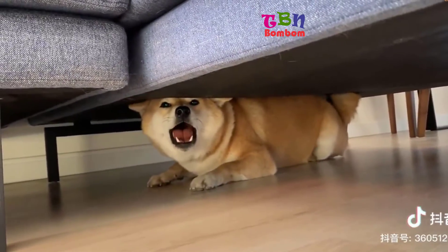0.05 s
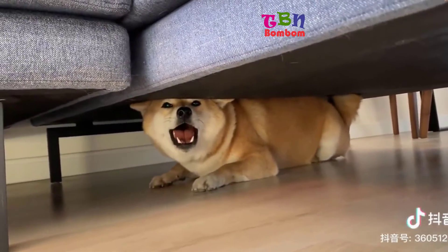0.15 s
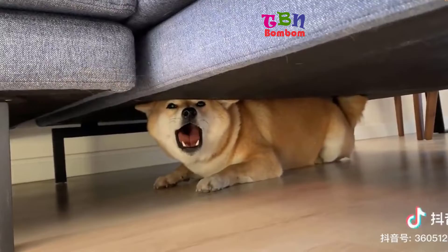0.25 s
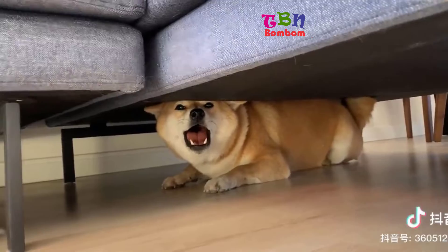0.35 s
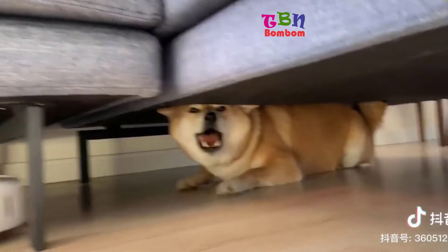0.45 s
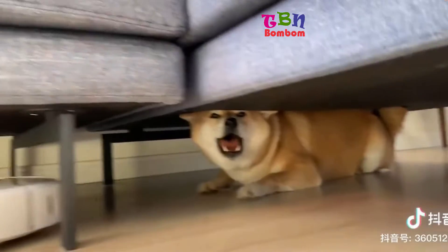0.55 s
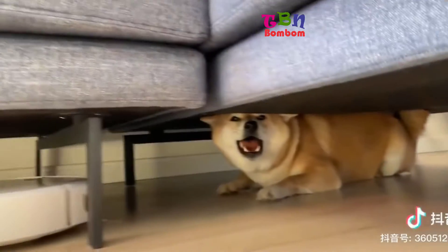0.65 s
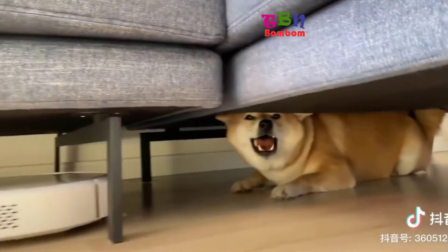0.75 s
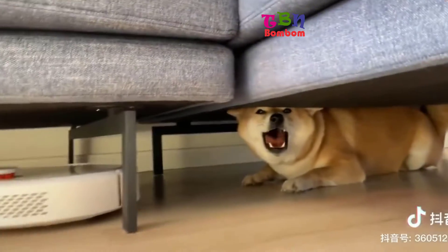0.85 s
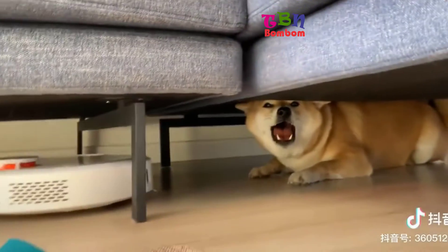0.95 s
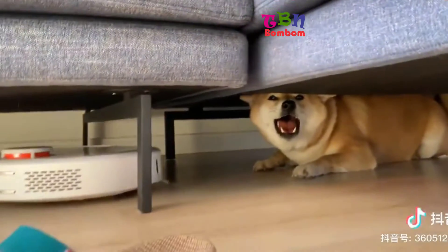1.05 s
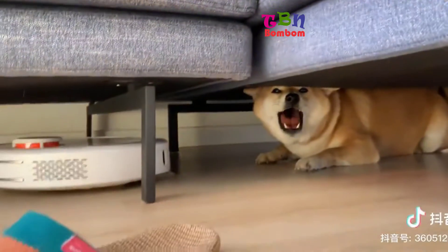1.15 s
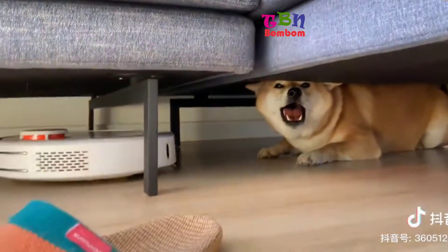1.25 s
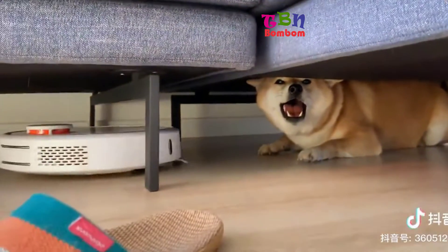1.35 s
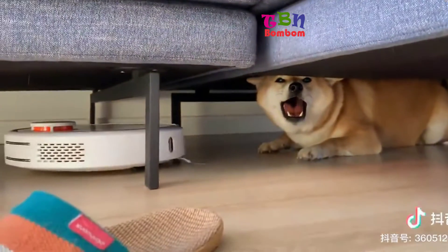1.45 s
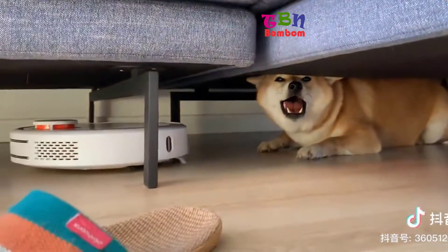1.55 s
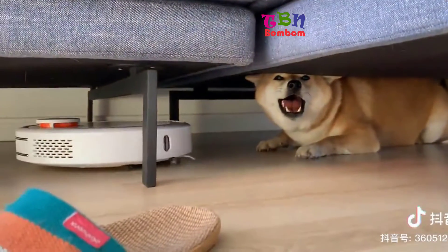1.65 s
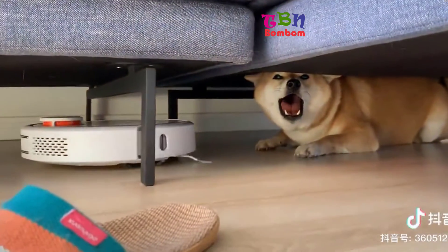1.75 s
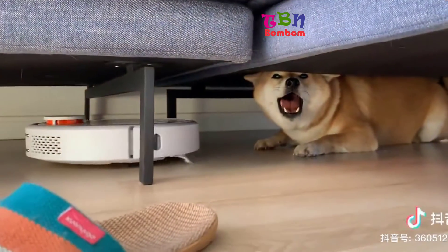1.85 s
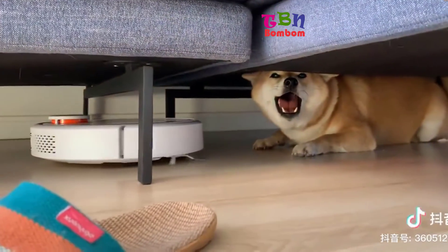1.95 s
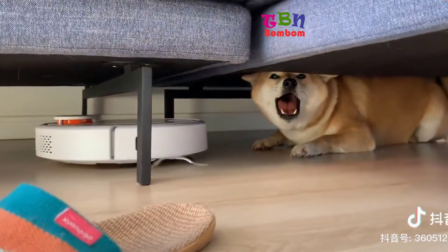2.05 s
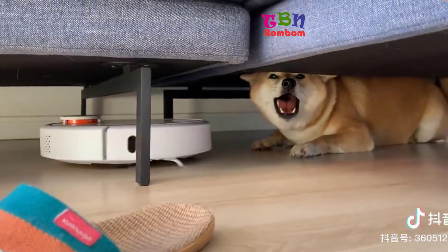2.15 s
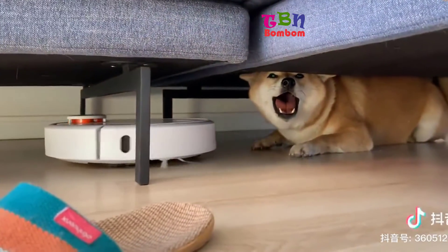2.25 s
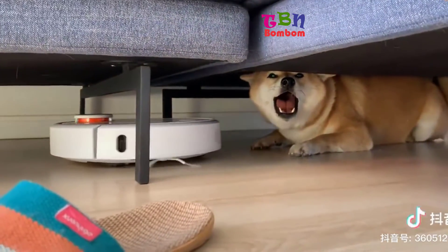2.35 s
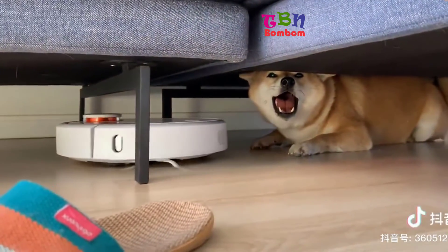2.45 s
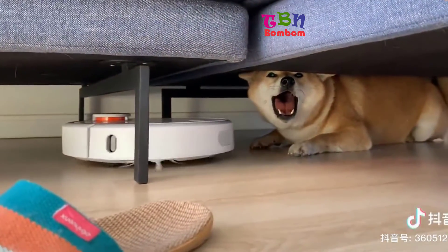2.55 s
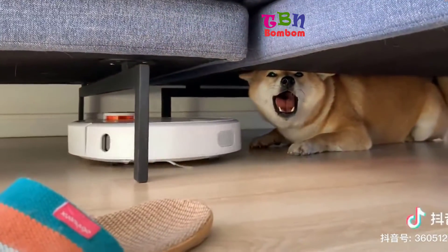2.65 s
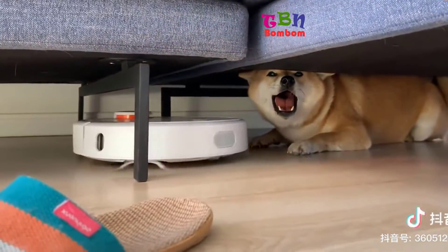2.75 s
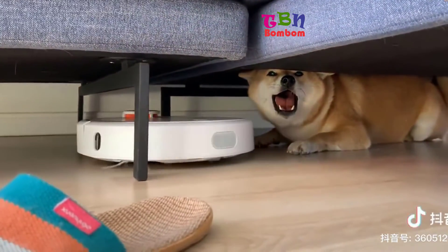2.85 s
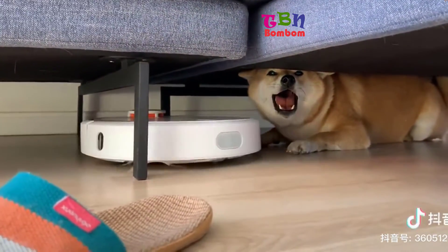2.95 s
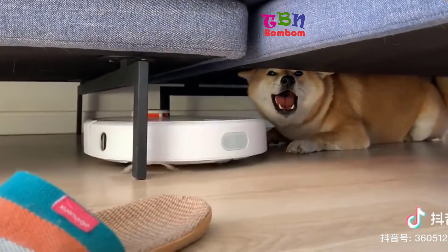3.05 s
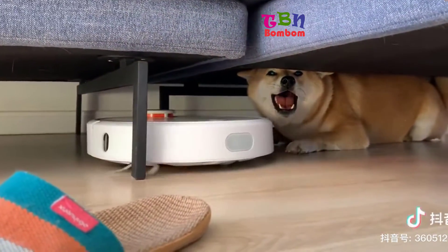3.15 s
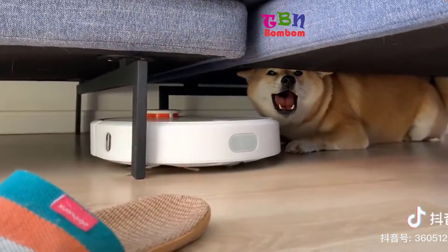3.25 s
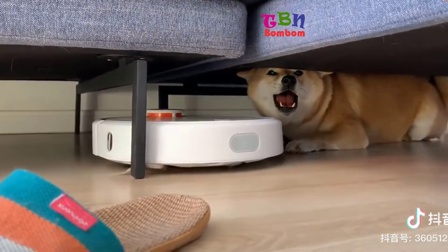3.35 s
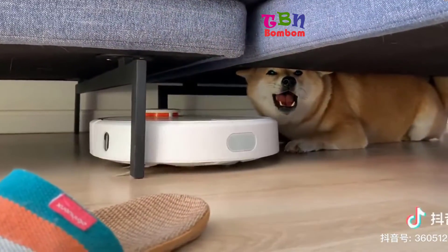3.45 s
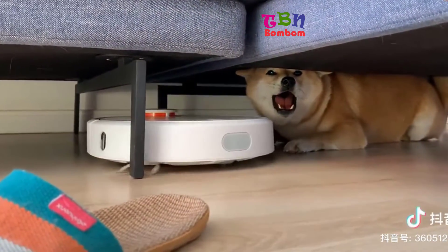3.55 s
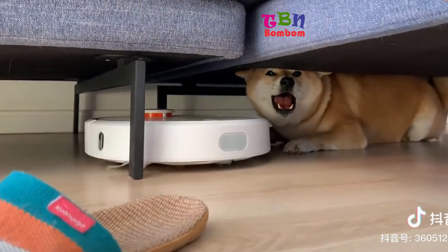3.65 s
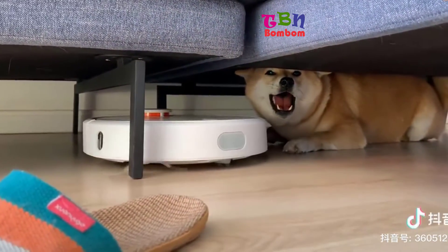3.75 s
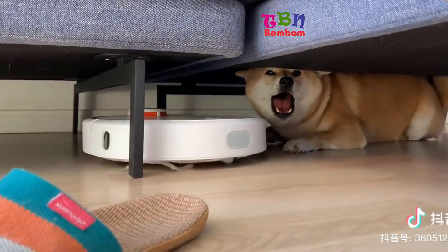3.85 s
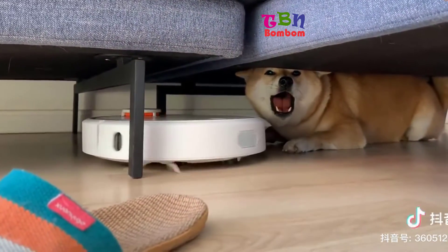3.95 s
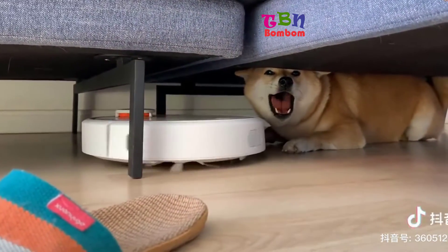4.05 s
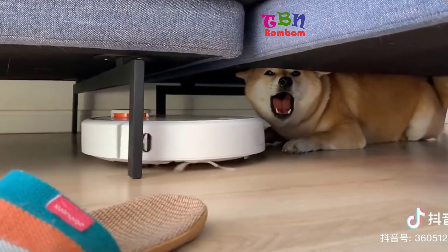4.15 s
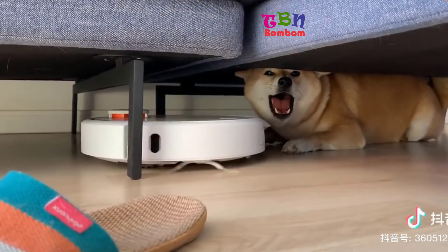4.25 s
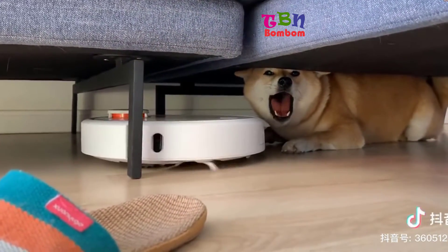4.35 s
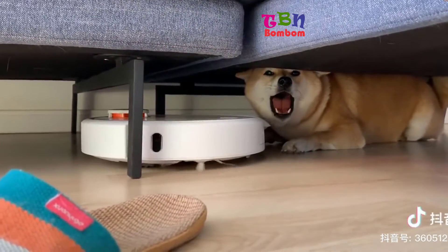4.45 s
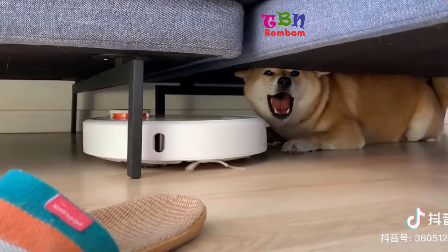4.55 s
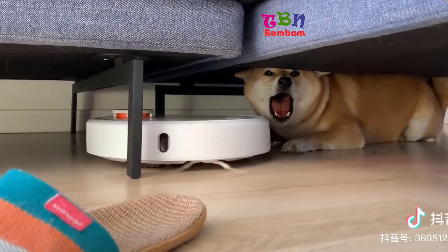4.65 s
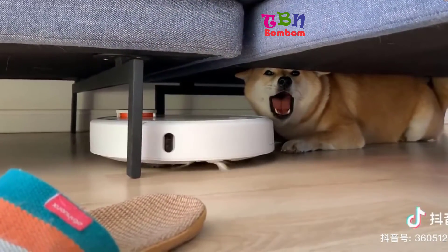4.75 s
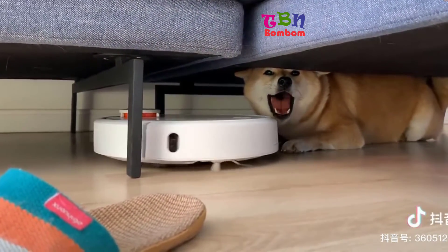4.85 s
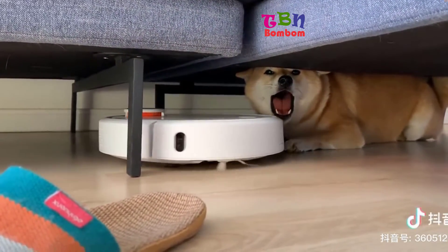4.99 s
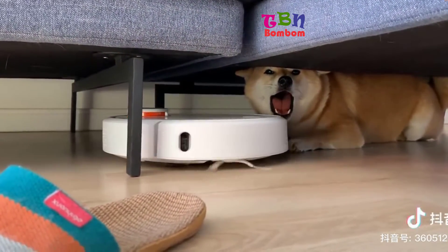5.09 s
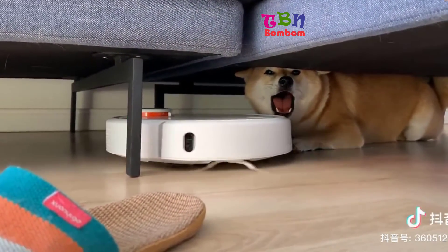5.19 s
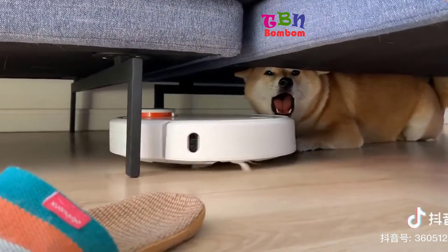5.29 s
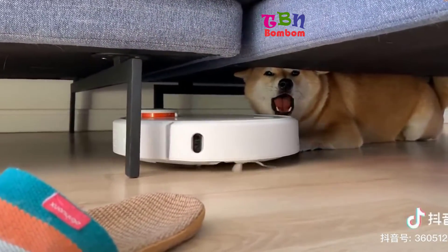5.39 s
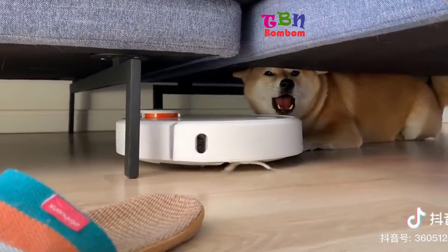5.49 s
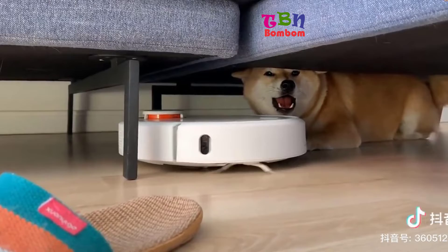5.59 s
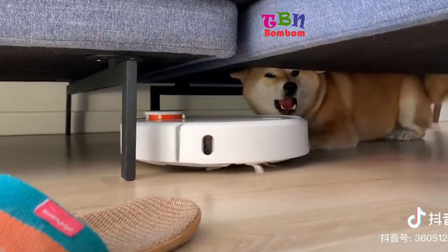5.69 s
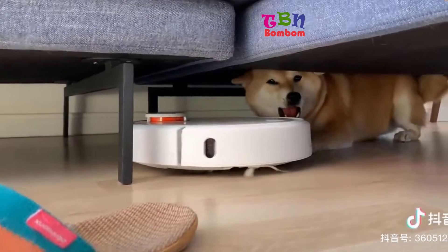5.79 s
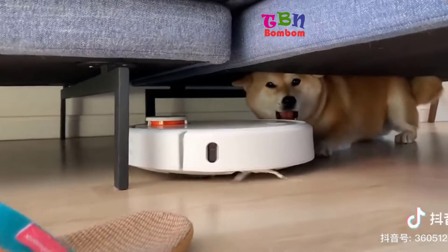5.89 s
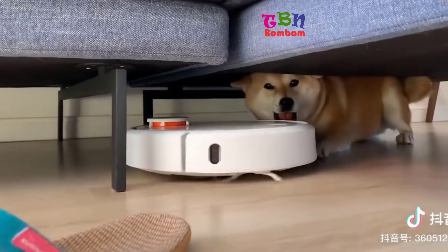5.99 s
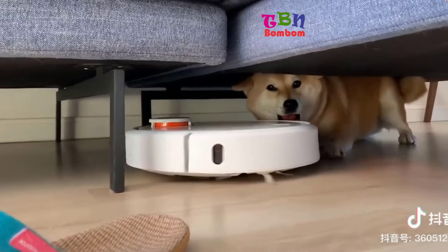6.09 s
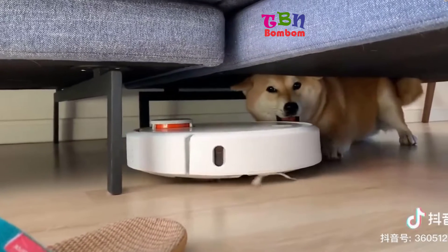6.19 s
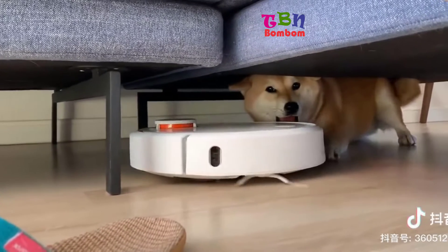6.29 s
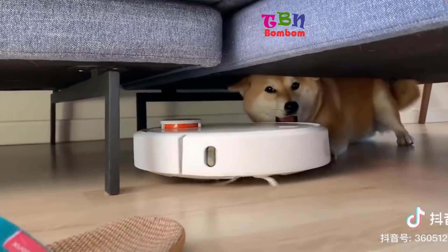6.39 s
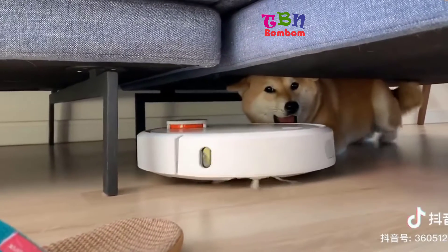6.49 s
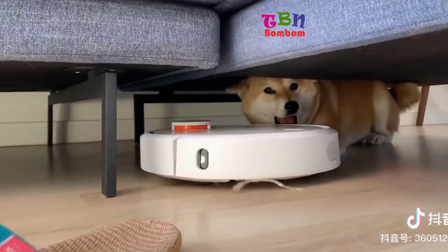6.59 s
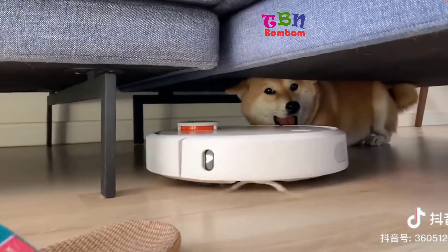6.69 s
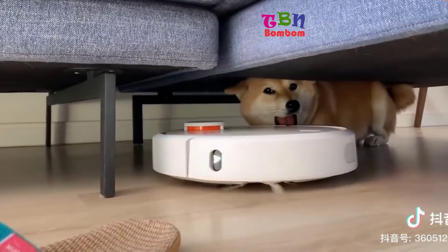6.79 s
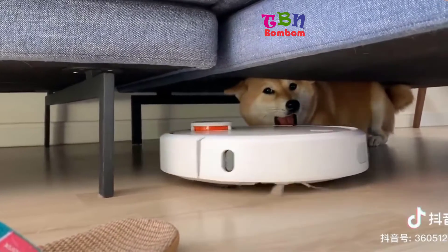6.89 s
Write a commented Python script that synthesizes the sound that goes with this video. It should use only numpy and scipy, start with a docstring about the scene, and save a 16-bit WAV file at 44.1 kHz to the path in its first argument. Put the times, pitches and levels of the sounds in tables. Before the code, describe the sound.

Under a sofa, a dog lets out a quick series of high yelps, many leaping to a shrill note and breaking into a rasp. Two stretch into longer whines, then a soft sinking whine and three weak yelps follow. Behind it a robot vacuum hums and hisses faintly, fading away. The living room rings briefly, and the loudest yelps slightly overload the close stereo microphone.

```python
"""A small dog yelps from under a sofa at a robot vacuum: the loud yelp rises, flips into a shrill, nearly pure
register, then breaks into a rasp as it falls and the vocal folds flutter. Some yelps stay in the open voice,
three calls stretch into whines, and the last ones are weak. Behind them the vacuum's motor hums and its fan
hisses, and this background grows steadily quieter. The gap under the sofa and the living room ring briefly, and
the loudest yelps overload the close stereo microphone."""
import sys
import numpy as np
from scipy import signal
from scipy.fft import rfft, irfft, next_fast_len
from scipy.io import wavfile
from scipy.ndimage import map_coordinates

SR = 44100
rng = np.random.default_rng(int(sys.argv[2]) if len(sys.argv) > 2 else 0)


def store_wav(level_fs):
    """Save 16-bit WAV to argv[1]."""
    pcm = np.round(np.clip(np.atleast_2d(level_fs), -1, 1) * 32767)
    wavfile.write(sys.argv[1], SR, pcm.T.astype(np.int16))


N = 305480

# yelps that flip into the shrill register: start/s, flip after/s, break after/s, length/s,
# first f/Hz, shrill f/Hz, last f/Hz, open level/dB, shrill level/dB, roughness/0-1
SHRILL_YELPS = [ (0.099, .052, .074, 0.13, 726.7, 1045, 508, -8, -4, 0.83),
                (1.029, 0.04, 0.075, 0.13, 817, 1082, 517, -7.5, -3.5, .85),
                (1.314, .036, .064, .112, 846, 1078, 491, -6, -5, 0.37),
                (1.896, 0.041, 0.067, .120, 862, 1087, 540, -7, -5.5, 0.37),
                (2.163, 0.034, 0.064, 0.11, 889, 1085, 495, -6.5, -5, .55),
                (2.445, 0.04, 0.069, 0.12, 876, 1076, 512, -7, -6, 0.4),
                (3.978, .027, .071, 0.1, 911, 1075, 560, -5.5, -3, 0.9),
                (4.252, 0.029, 0.07, 0.11, 861, 1074, 605, -6.5, -3.5, 0.8),
                (4.517, 0.028, .077, 0.13, 932, 1107, 680, -8, -4, 0.7),
                (4.797, 0.019, 0.067, 0.12, 969, 1123, 651, -7.5, -5.5, 0.28), ]
# yelps in the open voice: start/s, crest after/s, break after/s, length/s,
# first f/Hz, crest f/Hz, last f/Hz, fundamental level/dB, overtone level/dB, roughness/0-1
OPEN_YELPS = [ (0.407, .046, .088, 0.13, 782, 949.5, 503.4, -13.5, -8, 0.8),
              (0.708, 0.053, .078, 0.12, 685.4, 747, 547, -19, -15.5, 0.1),
              (1.613, 0.038, 0.1, 0.12, 850, 926, 615, -14.5, -8.5, 0.07),
              (3.437, 0.05, 0.044, .110, 903, 873, 674, -14.5, -13, 0.02),
              (3.705, 0.052, 0.1, 0.11, 862.5, 896.7, 649, -12, -10.5, .1),
              (6.192, 0.057, .073, .113, 625, 717, 513, -40, -30, 0.75),
              (6.43, 0.051, .046, 0.11, 665, 854, 529, -35.5, -27, 0.9),
              (6.687, 0.048, 0.062, 0.12, 687, 742, 526, -45, -37, 0.37), ]
# contours of the three whines: t/s, f/Hz, fundamental level/dB, overtone level/dB
LEVEL_WHINE = [(2.726, 914, -21, -24), (2.74, 928, -14, -10), (2.772, 924, -17, -10),
               (2.812, 749, -19, -17.5), (2.846, 798, -19, -26), (2.86, 954, -17.5, -27.5),
               (2.892, 863, -19.5, -19), (2.934, 869, -19, -14.5), (2.968, 838, -23, -21.5),
               (2.976, 891, -19.5, -17.5), (3.056, 829.4, -23, -16.5), (3.092, 862, -18, -15),
               (3.206, 817.8, -23.5, -20), (3.215, 768, -19, -26)]
CRACKING_WHINE = [(5.075, 997, -26.5, -26), (5.083, 1006, -15, -18), (5.099, 1099, -8.5, -22.5),
                  (5.133, 1079, -6.5, -21.5), (5.155, 787, -28.5, -20), (5.171, 750, -24.5, -21.5),
                  (5.215, 860, -29.5, -30.5), (5.269, 846, -23, -21), (5.285, 935, -15.5, -25),
                  (5.311, 891, -20.5, -21.5), (5.321, 811.6, -29.5, -24.5), (5.433, 812, -26.5, -22.5),
                  (5.447, 920, -13, -25), (5.487, 941, -12, -22), (5.533, 913, -14, -23.5),
                  (5.575, 859, -23, -32.5)]
SINKING_WHINE = [(5.803, 814, -41, -49), (5.829, 771, -30.5, -28.5), (5.873, 757, -29.5, -24),
                 (5.901, 686, -30.5, -28.5), (5.939, 697, -37.5, -30.5), (5.995, 594, -42, -31.5),
                 (6.03, 613, -34.5, -35.5)]
# where each whine breaks: contour, t/s, roughness/0-1
WHINES = [(LEVEL_WHINE, 2.79, .04), (CRACKING_WHINE, 5.144, .25), (SINKING_WHINE, 5.87, .02)]
# formants of the throat and open mouth: f/Hz, level/dB
THROAT_EQ = [(1050, 20), (1600, -1.5), (1900, 8), (2700, -1), (3150, -9.5), (3900, -11.5), (5000, -47.5),
             (9000, -26), (15000, -59.5)]
# air rushing past the vocal folds, and the snap of their closing: f/Hz, level/dB
BREATH_EQ = [(3000, -19.5), (5600, -13.5), (8000, 7), (10000, 6), (13500, 0.5), (15500, -2.5)]
# chaotic flutter of the folds, heard through the throat: f/Hz, level/dB
RASP_EQ = [(350, -34.5), (700, -14), (1050, 10.5), (1350, -2), (2400, -2.5), (3700, -3), (5200, -37)]
# a nearby surface throws an inverted copy at the microphone's right port: f/Hz, strength/0-1
BOUNCE_STRENGTH = [(1300, 0.12), (1650, 0.78), (2500, 0.47), (3100, 0.26)]
# shading of the right port: f/Hz, level/dB
SHADE_EQ = [(1700, 1.5), (2100, -4.5), (2700, 4.5), (4900, 4.5), (5600, -14.5), (7000, 3)]
# modes of the gap between floor and sofa: f/Hz, width/Hz, strength
SOFA_MODES = [(1047, 31, 1.62), (1915, 63, 1.21), (2142, 23, 1.03), (3200, 130, 1.2)]
# colour of the ring under the sofa: f/Hz, level/dB
SOFA_EQ = [(800, -3.5), (1300, 0), (1900, -2.5), (2500, -0.5), (3200, 1.5), (4000, -0.5)]
# the background level over time: t/s, motor level/dB, suction level/dB
VACUUM_LEVELS = [(0, -36.5, -44.5), (2.4, -45, -60), (4.2, -45.5, -61), (6.93, -62.5, -76.5)]
# rumble of motor and brushes: f/Hz, level/dB
MOTOR_EQ = [(40, -3), (120, -10), (230, -3.5), (400, -6), (1000, -9.5), (1350, -13.5), (1950, -8),
            (2600, -12), (5000, -35)]
# hiss of the suction fan: f/Hz, level/dB
SUCTION_EQ = [(4500, 3), (6500, 2.5), (8300, -3), (14000, -19)]

TOP_HZ = 15500  # band limit of voice and microphone


def dog(reverb_db=-14.5):
    """Each yelp and whine reaches the microphone directly and stirs the room anew."""
    breath, rasp = noise(BREATH_EQ), noise(RASP_EQ)
    calls = [shrill_yelp(*row) for row in SHRILL_YELPS]
    calls += [open_yelp(*row) for row in OPEN_YELPS]
    calls += [whine(*row) for row in WHINES]
    voice, reverb = np.zeros(N), np.zeros((2, N + 2 * SR))
    predelay = SR // 200
    for contour, break_s, depth in calls:
        i = np.arange(int(contour[0][0] * SR), int(contour[-1][0] * SR))
        call = vocal_folds(i / SR, contour, break_s, depth, breath[i], rasp[i])
        voice[i] += call
        tail = room(call)
        onset = i[0] + predelay
        reverb[:, onset:onset + tail.shape[1]] += tail
    return direct_sound(voice) + amp(reverb_db) * filtered(reverb[:, :N], sofa_gap)


def shrill_yelp(start, flip, crack, length, first_hz, top_hz, last_hz, open_db, shrill_db, depth,
                flip_s=.0063, flip_ratio=1.11, break_s=.012, break_ratio=.75, break_db=13.5,
                arch=.03, edge_db=2, purity_db_per_s=323.5):
    """The voice swells, flips up to an arched, nearly pure note, breaks and falls."""
    thin_db = shrill_db - purity_db_per_s * (crack - flip)  # longer notes have weaker overtones
    up, down = start + flip + flip_s / 2, start + crack - break_s / 2
    fundamental_db = open_db - 5.5  # in the open voice it lies under the overtones
    contour = swell(start, flip - flip_s / 2, first_hz, top_hz / flip_ratio, fundamental_db, open_db)
    contour += [(up, top_hz * (1 - arch / 2), shrill_db, thin_db + edge_db),
                ((up + down) / 2, top_hz, shrill_db, thin_db),
                (down, top_hz * (1 - arch), shrill_db - edge_db, thin_db + edge_db),
                (down + break_s, top_hz * break_ratio, shrill_db - break_db, thin_db + edge_db / 2),
                (start + length, last_hz, shrill_db - break_db - 4.5, thin_db - 12.5)]  # the rasp fades
    return contour, start + crack, depth


def open_yelp(start, crest, crack, length, first_hz, crest_hz, last_hz, fundamental_db, overtones_db,
              depth, knee_share=.6):
    """The voice swells to a crest and slides down; past a knee the overtones die away first."""
    knee_s = start + crest + knee_share * (length - crest)
    knee_hz = crest_hz + knee_share * (last_hz - crest_hz)
    contour = swell(start, crest, first_hz, crest_hz, fundamental_db, overtones_db)
    contour += [(knee_s, knee_hz, fundamental_db - 4, overtones_db - 6),
                (start + length, last_hz, fundamental_db - 7, overtones_db - 29)]
    return contour, start + crack, depth


def whine(held, break_s, depth, lift_db=1, sag_s=.019, sag_ratio=.83, sag_db=16.5):
    """A drawn-out note that closes by sagging in pitch and level."""
    contour = [(s, hz, low_db, high_db + lift_db) for s, hz, low_db, high_db in held]
    s, hz, low_db, high_db = contour[-1]
    contour.append((s + sag_s, hz * sag_ratio, low_db - sag_db, high_db - sag_db))
    return contour, break_s, depth


def swell(start, crest, first_hz, crest_hz, fundamental_db, overtones_db,
          swell_s=.013, push_db=3, pitch_lead=1.15):
    """A yelp's attack: growing effort lifts a soft, dull start, then pushes on to the crest."""
    share = min(swell_s / crest, .9)
    risen_hz = first_hz + pitch_lead * share * (crest_hz - first_hz)
    return [(start, first_hz, fundamental_db - push_db - 7, overtones_db - push_db - 8.5),
            (start + share * crest, risen_hz, fundamental_db - push_db, overtones_db - push_db),
            (start + crest, crest_hz, fundamental_db, overtones_db)]


def vocal_folds(t, contour, break_s, depth, breath, rasp, attack_s=.003, release_s=.0043,
                quaver=.006, quaver_db=1.85, waver=.006, jitter_rad=.004, rasp_jitter_rad=.56,
                breath_db=-35, rasp_breath_db=-16, snap_db=-25, pressed_db=-11):
    """The folds swing evenly along a contour, until a break turns part of the swing into flutter."""
    pitch, fundamental_db, overtones_db = curves(contour, t)
    rough = roughness(t - break_s, depth)
    # a tremble of the throat lifts pitch and overtones together
    tremble = wobble(70, len(t))
    fundamental_gain, overtone_gain = amp(fundamental_db), amp(overtones_db + quaver_db * tremble)
    unsteady_hz = pitch * (1 + quaver * tremble + waver * wobble(40, len(t)))
    phase = 2 * np.pi * np.cumsum(unsteady_hz) / SR
    phase += (jitter_rad + rasp_jitter_rad * rough) * wobble(750, len(t))
    k = np.arange(2, 25)[:, None]
    partials, partial_hz = np.cos(k * phase), k * pitch
    # pressed folds shut harder, so loud yelps are brighter and weak ones muffled
    effort = np.hypot(overtone_gain, .5 * fundamental_gain)
    bite = (effort / amp(pressed_db)) ** .35
    tilt = bite ** np.clip(np.log2(k / 2), 0, 1)
    overtones = blend(partials, partial_hz, tilt * throat(partial_hz, t - t[0]))
    # in the rasp the overtones dissolve first, while the fundamental carries on
    chaos = .42 * rough
    tone = np.sqrt(2 - chaos) * fundamental_gain * np.cos(phase)
    tone += np.sqrt(2 - 2 * chaos) * overtone_gain * overtones
    flutter = effort * np.sqrt(chaos) * rasp * (1 + .5 * np.cos(phase / 2))
    # air escapes once a cycle, and more of it when the folds flutter
    hiss = (amp(breath_db) + amp(rasp_breath_db) * rough) * (1 + np.cos(phase)) * breath
    # each closing snaps, which keeps the top end alive even in the shrill register
    snap = amp(snap_db) * blend(partials, partial_hz, amp(along(BREATH_EQ, partial_hz)))
    gate = np.clip((t - t[0]) / attack_s, 0, 1) * np.clip((t[-1] - t) / release_s, 0, 1)
    return gate * (tone + flutter + bite * effort * (hiss + snap))


def roughness(age, depth, rise_s=.007, heal_s=.036, hoarse=.002):
    """A break sets in at once and heals; a trace of hoarseness never leaves the voice."""
    onset = np.clip(age / rise_s + .5, 0, 1)
    return np.clip(hoarse + depth * onset * np.exp(-(age / heal_s) ** 2), 0, 1)


def throat(hz, age, pinch_hz=2700, width_hz=240, pinch_db=4.5, grow_s=.19):
    """Formant gains; on a held note the mouth narrows and a piercing resonance grows."""
    held = np.clip(age / grow_s - .5, 0, 1)
    pinch = np.exp(-((hz - pinch_hz) / width_hz) ** 2)
    return amp(along(THROAT_EQ, hz) + pinch_db * held * pinch)


def direct_sound(voice, swing_s=.95):
    """The dog lies on the side of the left port until the microphone swings round."""
    early = np.arange(N) < swing_s * SR
    before = filtered(voice * early, lambda hz: ports(hz, left_lag_s=-.000086, bounce_s=.00069))
    after = filtered(voice * ~early, lambda hz: ports(hz, left_lag_s=.00006, bounce_s=.001214))
    return before + after


def ports(hz, left_lag_s, bounce_s, left_db=1.34, right_db=-3.0):
    """The left port hears the dog clearly; the right one is partly shaded and combed by a bounce."""
    left = amp(left_db) * np.exp(-2j * np.pi * hz * left_lag_s)
    bounce = along(BOUNCE_STRENGTH, hz)
    comb = (1 - bounce * np.exp(-2j * np.pi * hz * bounce_s)) / np.hypot(1, bounce)
    right = amp(right_db + along(SHADE_EQ, hz)) * comb
    return np.array([left, right])


def room(call, wall_t60=.69, damping_hz=9000, sofa_db=1, sofa_t60=.024):
    """The hollow under the sofa answers briefly, the walls longer; the bass is nearly mono."""
    hz, t, grains = signal.stft(rng.standard_normal((2, SR // 2)), SR, nperseg=256)
    absorption = 1.5 + hz[:, None] / damping_hz  # shortens the wall decay, most in the treble
    walls = amp(-60 * t / wall_t60 * absorption)
    hollow = amp(sofa_db - 60 * t / sofa_t60)
    grains *= walls + hollow
    grains[1] *= np.clip(hz / 2000, 0, 1)[:, None]  # low cut on the side signal
    mid, side = signal.istft(grains, SR, nperseg=256)[1]
    impulse = np.array([mid + side, mid - side]) / np.linalg.norm(mid)
    return signal.oaconvolve(call[None], impulse, axes=1)


def sofa_gap(hz, treble_db=10, treble_hz=10000):
    """The gap under the sofa rings at a few pitches, and the hard floor scatters much of the treble."""
    modes = sum(strength / (1 + 2j * (hz - mode_hz) / width) for mode_hz, width, strength in SOFA_MODES)
    colour_db = along(SOFA_EQ, hz) + treble_db * np.minimum(hz / treble_hz, 1) ** 2
    return (1 + modes) * amp(colour_db)


def vacuum(hum_hz=212, hum_db=-11, whistle_hz=7488, whistle_db=-13):
    """Motor and brushes rumble around a wavering hum; the fan hisses and adds a thin whistle."""
    t = np.arange(N) / SR
    motor_db, suction_db = curves(VACUUM_LEVELS, t)
    hum_gain = amp(hum_db + 4.1 * wobble(25, N))
    hum = hum_gain * np.sin(2 * np.pi * hum_hz * t + .76 * wobble(35, N))
    whistle = amp(whistle_db) * np.sin(2 * np.pi * whistle_hz * t + wobble(36, N))
    rumble = amp(1.5 * wobble(5.1, N)) * wide_noise(MOTOR_EQ, side_db=-14.5)
    hiss = wide_noise(SUCTION_EQ, side_db=2.5)
    return amp(motor_db) * (rumble + hum) + amp(suction_db) * (hiss + whistle)


def amp(db):
    """Decibels to gain."""
    return 10 ** (np.asarray(db) / 20)


def along(points, hz):
    """A curve of (f/Hz, value) points, read on a log frequency axis."""
    f, values = np.transpose(points)
    return np.interp(np.log(hz + 1), np.log(f + 1), values)


def curves(rows, t):
    """One envelope for each column after the time column."""
    times, *columns = np.transpose(rows)
    return [np.interp(t, times, column) for column in columns]


def wobble(rate, size):
    """A smooth random modulator with `rate` knots a second."""
    knots = rng.standard_normal(int(size * rate / SR) + 4)
    return map_coordinates(knots, [np.arange(size) * rate / SR])


def blend(partials, hz, gains):
    """The partials below the band limit, mixed at constant power."""
    gains = gains * (hz < TOP_HZ)
    return (gains * partials).sum(0) / np.linalg.norm(gains, axis=0)


def filtered(x, response):
    """x through a complex frequency response."""
    size = next_fast_len(N + SR // 2)
    return irfft(rfft(x, size) * response(np.fft.rfftfreq(size, 1 / SR)), size)[..., :N]


def noise(eq):
    """Coloured noise of rms 1."""
    x = filtered(rng.standard_normal(N), lambda hz: amp(along(eq, hz)))
    return x / np.sqrt(np.mean(x ** 2) + 1e-20)


def wide_noise(eq, side_db):
    """Mid-side stereo noise with a mid of rms 1."""
    return noise(eq) + amp(side_db) * np.outer([1, -1], noise(eq))


def scene():
    """The dog up front, over the bed of the vacuum."""
    return dog() + vacuum()


def record(dry, ceiling=1.25, lopsided=.0045):
    """The microphone flattens the loudest peaks, a little unevenly, and cuts off at its band limit."""
    bent = dry + lopsided * dry ** 2
    clipped = bent / (1 + np.abs(bent / ceiling) ** 10) ** (1 / 10)
    return filtered(clipped, lambda hz: hz < TOP_HZ)


dry = scene()
out = record(dry)
store_wav(out)
```